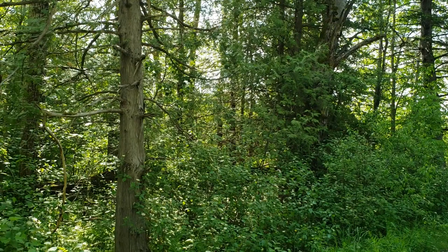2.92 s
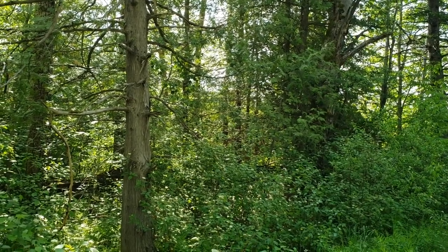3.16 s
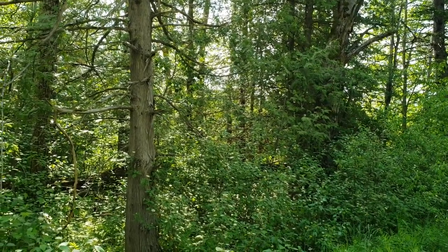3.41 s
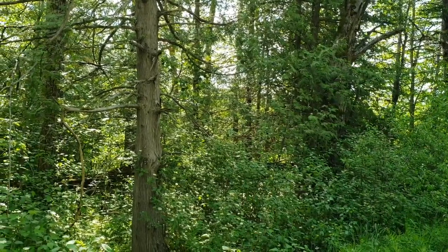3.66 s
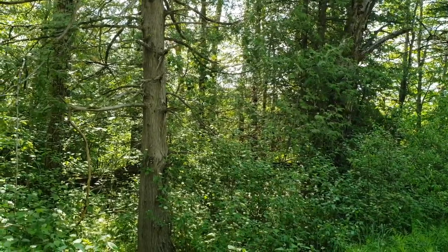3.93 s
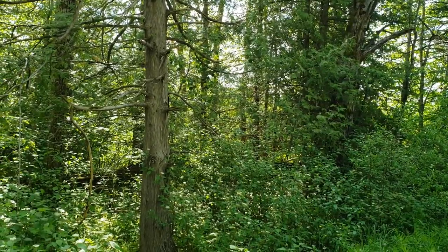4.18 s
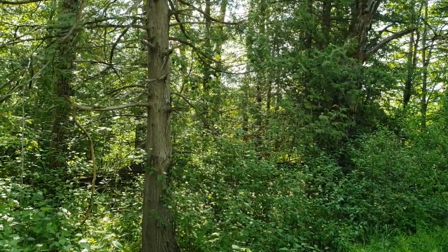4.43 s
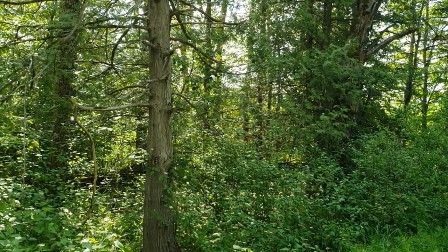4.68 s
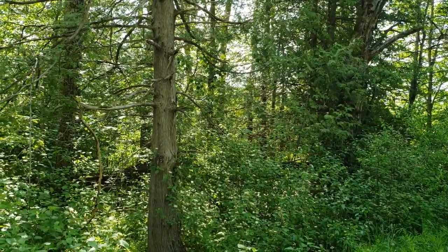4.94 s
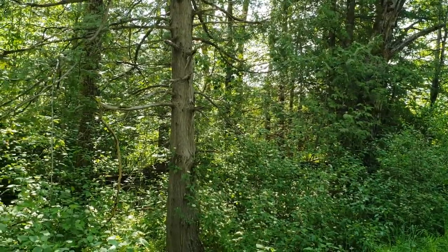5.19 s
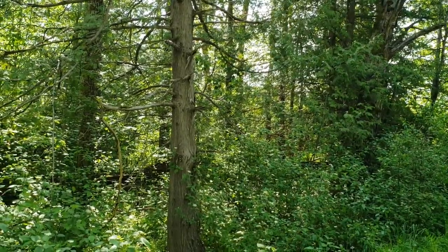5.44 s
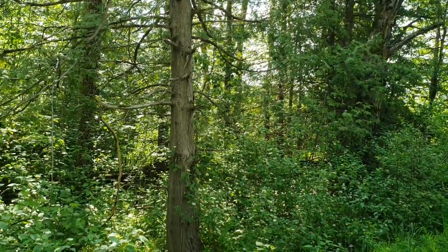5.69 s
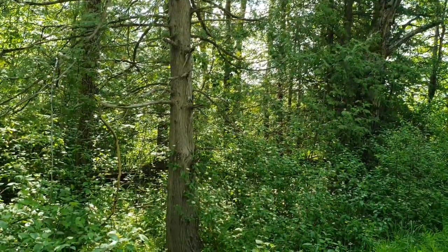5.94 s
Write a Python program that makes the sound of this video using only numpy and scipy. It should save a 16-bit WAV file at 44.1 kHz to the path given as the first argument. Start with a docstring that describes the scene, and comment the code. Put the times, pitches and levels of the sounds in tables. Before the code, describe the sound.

A quiet wood with steady soft leaf hiss and a low, lumpy rumble that shifts between sides and slowly grows. From 0 to about 1.3 seconds a far warbler repeats a quick rippling phrase about twice a second, the third time cut short. Thin, throbbing, very faint whistles follow from 1.1 to 2.2, with one tiny falling chip near 1.5. From 2.1 to 3.1 a second bird gives clear high notes, mostly slurring down, growing stronger; behind it a third bird trills faintly from 2.2 to 2.8. At 3.1 a nearer warbler starts softly and repeats a rapid, bright four-note syllable about three times a second, swelling until about 4.1, then holding strong through 5.5. Its echo fades among the trees to the end at 6. Small taps on the microphone housing occur near 0.7, 2.2, 5.5 and 5.9.

```python
"""Leaf hiss and a low rumble come first, and almost at once a far warbler repeats a warbling phrase.
Thin distant whistles follow, then a lone falling chip from another bird; a second bird slurs mostly
downwards as a third trills. Last a near warbler repeats a syllable that swells. Notes are near sines,
scattered by trunks and leaves into a long tail. Two unlike microphones hear the wood; hiss and rumble
are shaped noise, and a few taps on the housing are short rings with a low push."""
import sys
import numpy as np
from scipy import signal
from scipy.fft import rfft, irfft, next_fast_len
from scipy.io import wavfile
from scipy.ndimage import uniform_filter1d

SR = 44100
rng = np.random.default_rng(int(sys.argv[2]) if len(sys.argv) > 2 else 0)


def log_audio(samples):
    """Write samples as a 16-bit WAV file to the path given in sys.argv[1]."""
    # one column per channel
    frames = np.atleast_2d(samples).T
    # limit to full scale, then quantise
    limited = np.clip(frames, -1, 1)
    pcm = np.round(limited * 32767).astype(np.int16)
    wavfile.write(sys.argv[1], SR, pcm)


def nominal_scale(level):
    """Amplitude ratio for a level in decibels (scalar or array-like)."""
    x = np.asarray(level, float) / 20
    return 10 ** x


N = 267907  # samples

# Bed of leaf hiss, far chorus and rumble: hz, left_db_per_hz, right_db_per_hz
BED = [(22, -116, -116), (41.7, -107, -97.5), (55.6, -89.5, -86), (79.2, -85, -92.5), (104, -104.5, -102.5),
       (142, -105, -106), (262, -107, -108), (643, -112, -115), (1045, -109, -117), (1648, -92, -117),
       (1830, -89, -115), (2800, -92.5, -112), (4100, -91, -102), (5500, -98, -105), (7630, -102, -113),
       (8080, -116, -123), (10100, -119, -118), (13000, -119, -115), (15700, -120, -119),
       (15200, -150, -150)]
# Left-right likeness of the bed above the rumble: hz, correlation (-1 to 1)
BED_LIKENESS = [(60, 1), (180, 0.15), (550, 0.65), (1650, 0.076), (4970, -0.16), (15000, 0.015)]
# Wind gusts and one lull in the rumble: middle_s, half_width_s, extra_db, left_over_right_db
GUSTS = [(.62, 0.089, 4, 7), (2.3, 0.12, 5, -2), (3.36, .08, -7, 5), (4.35, .12, 4.5, -3),
         (4.9, 0.049, 4, 3), (5.44, 0.15, 4.5, -23.5), (5.86, 0.15, 1, -11)]
# The rumble grows slowly, comes in lumps and wanders between the sides
RISE_DB_PER_S, LUMPS_DB, WANDER_DB, RUMBLE_LIKENESS = 0.9, 3, 4, 0.65
# Far warbler, one list a note of its phrase: after_start_s, pitch_hz, relative_level_db
FAR_PHRASE = [
    [(.015, 3370, -10), (.036, 3747, 3), (.065, 4266, 0), (.09, 4580, -4.5), (.108, 4430, -2)],
    [(.142, 6300, -2.5), (.16, 5370, -5), (.175, 4660, -0.5), (.2, 4814, -5.5), (.215, 5600, -6),
     (.23, 6830, 0)],
    [(.275, 6200, -7), (.295, 5500, 2), (.305, 4930, -0.5), (.33, 4950, -11), (.365, 5040, -2)],
    [(.372, 5780, -2), (.395, 5750, -12), (.41, 4750, 2), (.433, 3680, -1), (.455, 3350, -16)],
]
# Its repeats: start_s, then gain_db of each of the four notes
FAR_REPEATS = [(0.03, -51, -51, -54, -50), (.53, -50, -49.5, -54, -50), (1.032, -50.5, -50.5, -69, -68)]
# Thin distant whistles: start_s, end_s, pitch_hz, gain_db, left_over_right_db
WHISTLES = [(0.279, 0.772, 1725, -87.5, -23), (1.137, 1.258, 7630, -71, 9), (1.236, 1.38, 7980, -63.5, 4),
            (1.5, 1.656, 7625, -66, 4.5), (1.6, 1.712, 7855, -63.5, 6), (1.614, 1.8, 5700, -70.5, -1),
            (1.637, 1.762, 3200, -67.5, -3), (1.7, 1.835, 2916, -63.5, 1), (1.773, 1.796, 6080, -70, -2),
            (1.836, 1.962, 4880, -65.5, -8), (1.851, 1.98, 4140, -53, -1), (1.982, 2.085, 4184, -58.5, 5),
            (2.1, 2.174, 4270, -65, 1), (3.255, 3.308, 2705, -54, -3), (3.46, 3.59, 6760, -68, 6)]
THROB_PER_S, THROB_DEPTH = 24.54, 0.78
# Taps on the housing: middle_s, ring_hz, left_ring_peak_db, right_ring_peak_db, push_gain_db
TAPS = [(.682, 13670, -62, -33.5, -84), (2.2416, 2260, -32.5, -72, -54), (5.543, 1880, -30.5, -62, -50.5),
        (5.923, 3150, -35.5, -71, -71)]
CYCLES_AT_1K, CYCLES_LAW = .5, 0.48  # higher rings last more cycles
# Another bird's lone chip
LONE_CHIP_S, LONE_CHIP_DB = 1.464, -60
# Second bird: start_s, length_s, last_pitch_hz, gain_db, bend (more = holds the pitch longer)
SLURS = [(2.11, 0.035, 6087, -60.5, 1.2), (2.25, .118, 4750, -55.5, 1.5), (2.42, 0.13, 4600, -41, 2.06),
         (2.59, .138, 3914, -36.5, 2.7), (2.772, .14, 3804, -37, 3.0), (2.955, 0.16, 7380, -34, 2.32)]
SLUR_HZ, ACCENT_DB, ACCENT_S, ARCH_DB, FADE_DB = 6803, 6.5, 0.012, 2, -11  # sharp start, a swell, a fade
# One falling chip, alone and in the third bird's trill: after_start_s, pitch_hz, relative_level_db
CHIP = [
    [(.004, 4373, -3), (.014, 4100, 11.5), (.027, 3630, 4.5)],
]
# Third bird's repeats of it: start_s, gain_db
CHIP_REPEATS = [(2.206, -67), (2.288, -64), (2.374, -63.5), (2.457, -65), (2.544, -62.5), (2.628, -60),
                (2.713, -65)]
# Near warbler, one list a note of its syllable: after_start_s, pitch_hz, relative_level_db
NEAR_SYLLABLE = [
    [(.014, 9690, -14.5), (.02, 8100, -5.5), (.026, 7000, -5.5), (.036, 5873, -4.5)],
    [(.05, 4100, -9), (.058, 4534, 1), (.068, 4820, -3), (.1, 4700, -9), (.13, 4580, -44)],
    [(.129, 9207, -16.5), (.138, 7235, -7), (.147, 5700, -1), (.153, 4797, -4.5), (.161, 4280, -4.5),
     (.172, 4224, -4)],
    [(.186, 5158, -7.5), (.203, 4344, 0), (.222, 3500, -1), (.238, 2960, -2.5), (.25, 2800, -33)],
]
# Its repeats: start_s, effort_db
NEAR_REPEATS = [(3.068, -26.5), (3.399, -15.5), (3.723, -6), (4.032, -1), (4.34, 0.8), (4.649, 0.76),
                (4.957, 0.87), (5.276, 0.56)]
# Gain of each of the four notes at 0 dB effort: gain_db
NEAR_FULL = [-33.5, -34, -32, -35]
# How far each note sinks as the effort falls: db_per_db
NEAR_YIELD = [1.7, 0.96, 0.91, 0.5]
# Second and third harmonic, before strain and beak: level_over_note_db
NEAR_OVERTONES = [-31, -27.5]
# Slow tail of the wood: hz, t60_s
WOOD_TAIL = [(1500, 0.28), (3000, 0.32), (5000, 0.91), (7500, 0.71), (14000, 0.092)]
# How each microphone hears the birds: hz, left_db, right_db
MICROPHONES = [(1550, 23, -1), (2800, 0, -16), (3500, 4, -6.5), (4800, 1, -6.5), (5700, 0, -4),
               (7000, 2, -9.5), (8530, -14.5, -23), (9900, 7, 11.5), (13200, -12, 2.5), (14200, -7, 5.5),
               (15600, -22, 1), (16000, -25, -29)]


def read(points, hz):
    """Each column after the first, on a log-frequency axis."""
    f, *columns = np.transpose(points)
    return np.array([np.interp(np.log(hz + 1), np.log(f + 1), c) for c in columns])


def add(mix, s, sound):
    """Lays a sound into the mix at s seconds, cut at the end."""
    part = mix[..., round(s * SR):][..., :sound.shape[-1]]
    part += sound[..., :part.shape[-1]]


def drift(length, size):
    """Slow chance of rms 1: noise averaged twice over size steps."""
    x = rng.standard_normal(length + 4 * size)
    x = uniform_filter1d(uniform_filter1d(x, size), size)[size:size + length]
    return x * np.sqrt(1.5 * size)


def beak(hz, centre_hz=13700, width_hz=2200):
    """The open beak lets overtones out only near its resonance."""
    return np.exp(-((hz - centre_hz) / width_hz) ** 2)


def note(mix, start, rows, gain_db=0, overtones_db=(), flutter_db=3.0, flutter_s=0.0035):
    """A near sine from the syrinx; the air on the way makes its level flutter."""
    s, hz, db = np.transpose(rows)
    t = np.arange(s[0], s[-1], 1 / SR)
    pitch_hz = np.interp(t, s, hz)
    phase = 2 * np.pi * (np.cumsum(uniform_filter1d(pitch_hz, 90)) / SR + rng.random())
    wave = np.sin(phase)
    strain_db = 1.29 * (gain_db + 37.5)  # overtones grow faster than the note
    for harmonic, db_over_note in enumerate(overtones_db, 2):
        wave += nominal_scale(db_over_note + strain_db) * np.sin(harmonic * phase) * beak(harmonic * pitch_hz)
    flutter = flutter_db * drift(len(t), size=round(flutter_s * SR))
    level = nominal_scale(np.interp(t, s, db) + gain_db + flutter)
    edges = np.minimum(np.minimum(t - s[0], s[-1] - t) / 0.0023, 1) ** 2
    add(mix, start + s[0], np.sqrt(2) * wave * level * edges)


def song(template, rows, **voice):
    """Repeats one template, each note at its own gain."""
    mix = np.zeros(N)
    for s, *gains_db in rows:
        for points, db in zip(template, gains_db):
            note(mix, s, points, db, **voice)
    return mix


def forest(x, direct_db, early_db, early_t60, late_db, rise, blur, right_lag=0):
    """A direct sound blurred by twigs, scatter off near trunks, and a slow tail that loses treble.
    Levels are left and right; early_t60 and blur are t60s, rise and right_lag times, all in seconds."""
    hz, t, z = signal.stft(rng.standard_normal((2, 3, 2, SR + SR // 2)), SR, nperseg=128)
    z[0] *= nominal_scale(-60 * t / early_t60)
    z[1] *= nominal_scale(-60 * t / read(WOOD_TAIL, hz)[0][:, None])
    tails = signal.istft(z, SR, nperseg=128)[1][..., :SR]
    t = np.arange(SR) / SR
    tails *= 1 - np.exp(-t / rise)
    twigs = rng.standard_normal((2, SR)) * (rng.random((2, SR)) < .05) * nominal_scale(-60 * t / blur)
    twigs[:, 0] = 1.0  # the clear line of sight
    first, early, late = (p / np.linalg.norm(p, axis=-1, keepdims=True) for p in (twigs, *tails))
    # the sound passes in turn through three unlike sets of scatter, so the tail's colour evens out,
    # at constant power
    turn = np.pi * (1.116 * np.arange(N) / SR + np.arange(3)[:, None, None] / 3)
    both = x * np.ones((2, 1))
    scatter = nominal_scale(early_db) * early + nominal_scale(late_db) * late
    heard = signal.fftconvolve(np.sqrt(2 / 3) * np.cos(turn) * both, scatter, axes=2).sum(0)
    heard += signal.fftconvolve(both, nominal_scale(direct_db).reshape(2, 1) * first, axes=1)
    heard[1] = np.roll(heard[1], round(right_lag * SR))  # the straight way to one side is screened
    return heard[:, :N]


def leaves_and_rumble():
    """Random short-time spectra with faint patches; the rumble swells and shifts side with the wind."""
    frames, hz = N // 512 + 5, np.fft.rfftfreq(2048, 1 / SR)
    a, b, c, d, patches = rng.standard_normal((frames, 1025, 5)).T
    patches = uniform_filter1d(uniform_filter1d(patches, 20, 0), 8, 1)
    t = np.arange(-2, frames - 2) * 512 / SR
    s, half, gust_db, side_db = np.transpose(GUSTS)
    gusts = np.exp(-((t[:, None] - s) / half) ** 2)
    level_db = RISE_DB_PER_S * (t - t.mean()) + LUMPS_DB * drift(frames, size=8) + gusts @ gust_db
    pan_db = WANDER_DB * drift(frames, size=12) + gusts @ side_db
    low = 1 / (1 + (hz[:, None] / 130) ** 4)  # share of rumble at each pitch
    same = np.clip((1 - low) * read(BED_LIKENESS, hz).T + low * RUMBLE_LIKENESS, -1, 1)
    left = a + 1j * b
    right = same * left + np.sqrt(1 - same ** 2) * (c + 1j * d)
    rumble_db = level_db + np.array([pan_db / 2, -pan_db / 2])[:, None]
    bed_db = read(BED, hz)[:, :, None] + 1.4 * patches / patches.std() + low * rumble_db
    z = np.array([left, right]) * nominal_scale(bed_db)
    x = signal.istft(z, nperseg=2048, noverlap=1536)[1][:, :N]
    return x * np.sqrt(SR / 2048 * 3 / 2)  # brings the overlapped frames to dB per Hz


def far_warbler():
    """Four-note phrases from far off; the wood delays them to the right."""
    return forest(song(FAR_PHRASE, FAR_REPEATS), [-5, -11], [[-3], [-3]], 0.61, [[-5], [-4]], 0.0012,
                  blur=0.0096, right_lag=.008)


def whistles():
    """Steady thin sines that throb in level, each panned to its own place."""
    thin = np.zeros((2, N))
    for start, end, hz, db, pan_db in WHISTLES:
        one = np.zeros(N)
        note(one, 0, [(start, hz, db), (end, hz, db)], flutter_s=0.0054)
        throb = np.cos(2 * np.pi * THROB_PER_S * (np.arange(N) / SR - start))
        one *= 1 - THROB_DEPTH * np.tanh(1.76 * throb)
        thin += one * nominal_scale([[pan_db / 2], [-pan_db / 2]])
    return forest(thin, [-1.5, -1.5], [[-7], [-7]], 0.3, [[-11], [-11]], 0.0043, blur=0.0095)


def taps():
    """A ring of a few cycles, a low push and a short rattle after it."""
    mix, t = np.zeros((2, N)), np.arange(-200, 3000) / SR
    for s, hz, left_db, right_db, push_db in TAPS:
        cycles = CYCLES_AT_1K * (hz / 1000) ** CYCLES_LAW
        ring = np.cos(2 * np.pi * hz * t) * np.exp(-(t * hz / cycles) ** 2)
        push = np.exp(-(t / 0.00036) ** 2)
        push -= 1.1 * np.exp(-((t - .0008) / 0.00014) ** 2)  # narrow opposite swing
        push += 0.24 * np.exp(-(t / 0.0014) ** 2)
        noise = uniform_filter1d(rng.standard_normal((2, len(t))), 14)
        rattle = nominal_scale(0.5 - 60 * abs(t) / 0.27) * noise * (t > 0)
        add(mix, s + t[0], nominal_scale([[left_db], [right_db]]) * ring + nominal_scale(push_db) * (push + rattle))
    return mix


def slur(mix, start, length, last_hz, db, bend):
    """Leaves the common pitch slowly, then fast, and lands softly."""
    u = np.linspace(0, 1, 40)
    accent_db = ACCENT_DB * np.exp(-u * length / ACCENT_S)
    arch_db = -ARCH_DB * np.cos(np.pi * u ** 1.2) ** 2
    level_db = db + accent_db + arch_db + FADE_DB * u ** 6
    hz = SLUR_HZ + (last_hz - SLUR_HZ) * np.sin(np.pi / 2 * u ** bend)
    note(mix, start, np.transpose([u * length, hz, level_db]))


def lone_chip_and_second_bird():
    """Gliding sines, with another bird's lone chip heard through the same scatter."""
    calls = np.zeros(N)
    for row in SLURS:
        slur(calls, *row)
    note(calls, LONE_CHIP_S, CHIP[0], LONE_CHIP_DB)
    return forest(calls, [-7, -10], [[-4], [-5]], 0.4, [[-7], [-7]], 0.0032, blur=0.021)


def third_bird():
    """A trill: one falling chip repeated quickly."""
    return forest(song(CHIP, CHIP_REPEATS), [-11, -7], [[-5], [-6]], 0.64, [[-6], [-7]], 0.025, blur=0.021)


def near_warbler():
    """A four-note syllable whose notes and overtones grow unequally with effort."""
    full_db, yield_db = np.array(NEAR_FULL), np.array(NEAR_YIELD)
    sung = [(s, *(full_db + effort_db * yield_db)) for s, effort_db in NEAR_REPEATS]
    return forest(song(NEAR_SYLLABLE, sung, overtones_db=NEAR_OVERTONES), [-7, -6], [[-4], [-4]], 0.7,
                  [[-6], [-5]], 0.011, blur=0.045)


def microphones(heard):
    """Each of the two microphones colours the birds with its own response."""
    size = next_fast_len(N)
    response = nominal_scale(read(MICROPHONES, np.fft.rfftfreq(size, 1 / SR)))
    return irfft(rfft(heard, size) * response, size)[:, :N]


def scene():
    """The birds through wood and microphones, over the bed and the taps."""
    birds = far_warbler() + whistles() + lone_chip_and_second_bird() + third_bird() + near_warbler()
    return leaves_and_rumble() + taps() + microphones(birds)


def top_cut(x):
    """Nothing passes above the cut-off."""
    return signal.sosfilt(signal.butter(12, 16480, fs=SR, output="sos"), x)


def record(dry):
    """Passes on the finished mix at its own level."""
    return top_cut(dry)


dry = scene()
out = record(dry)
log_audio(out)
```